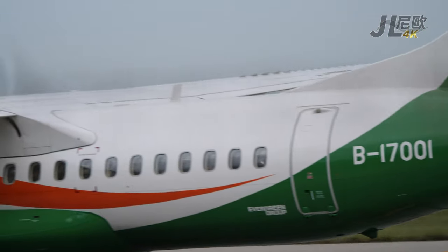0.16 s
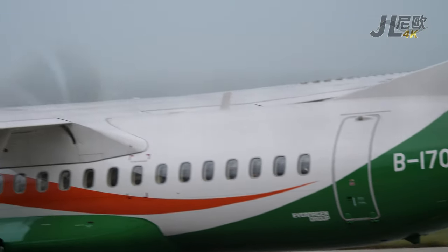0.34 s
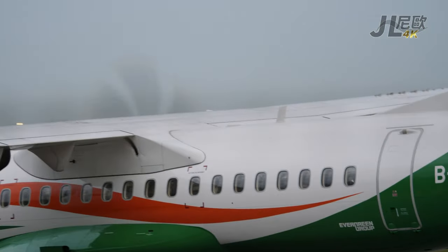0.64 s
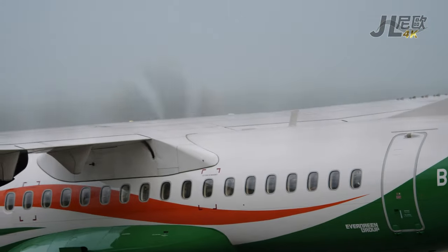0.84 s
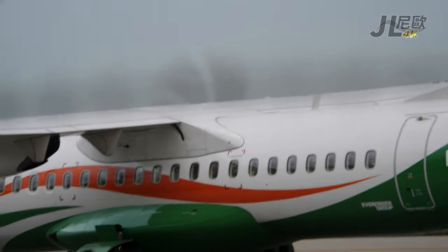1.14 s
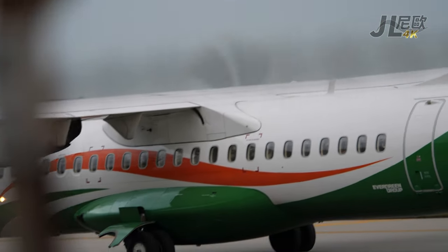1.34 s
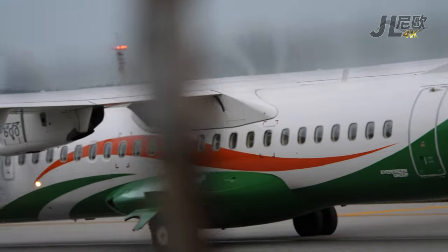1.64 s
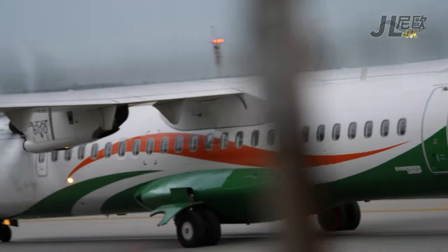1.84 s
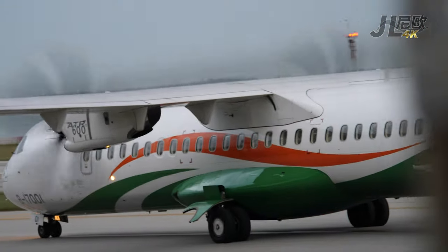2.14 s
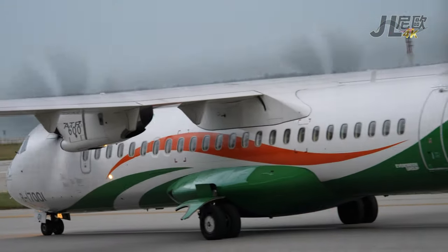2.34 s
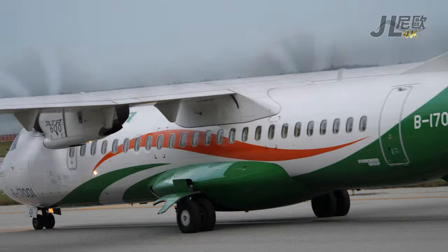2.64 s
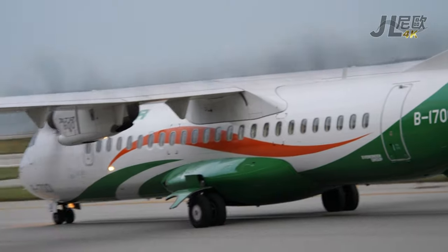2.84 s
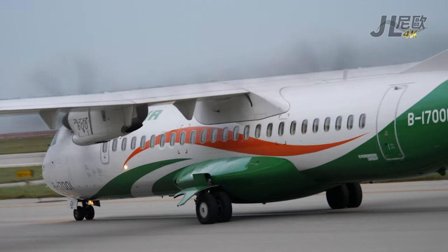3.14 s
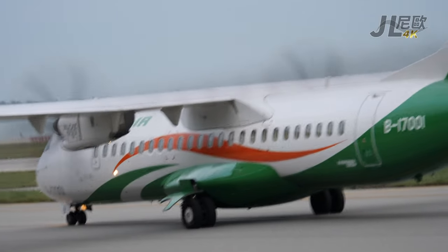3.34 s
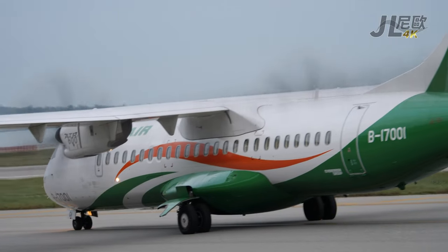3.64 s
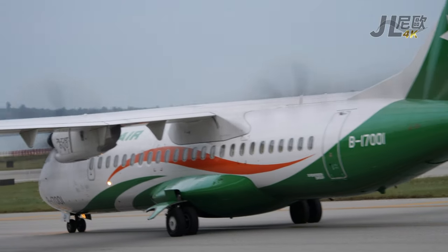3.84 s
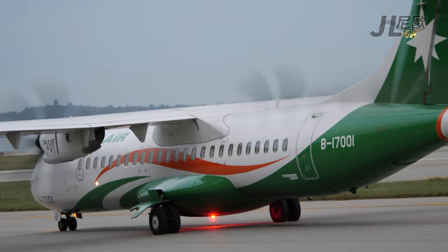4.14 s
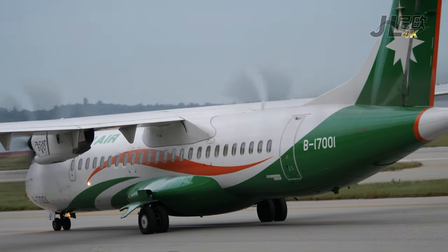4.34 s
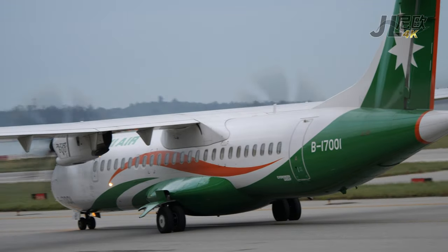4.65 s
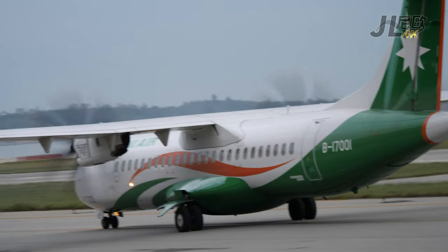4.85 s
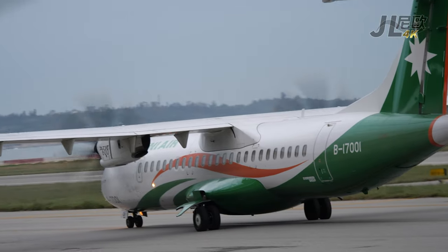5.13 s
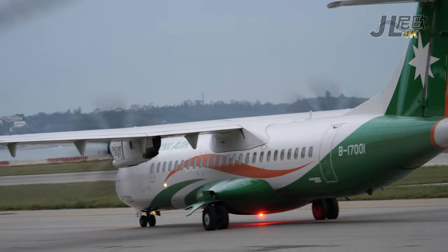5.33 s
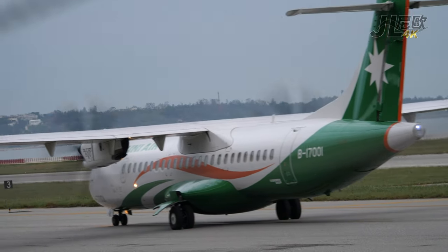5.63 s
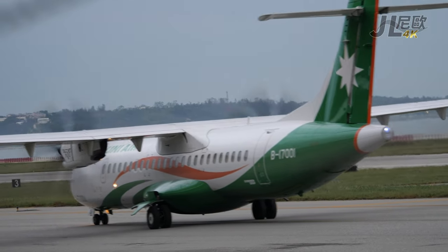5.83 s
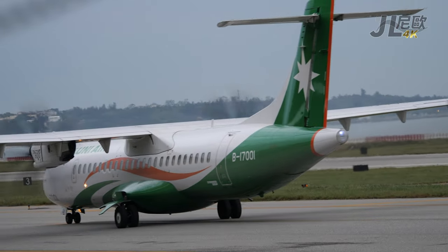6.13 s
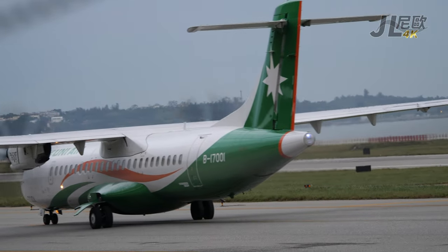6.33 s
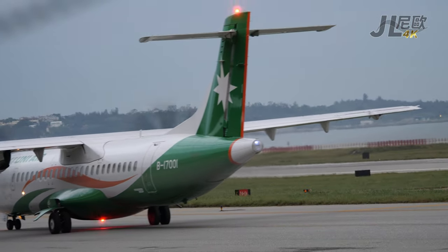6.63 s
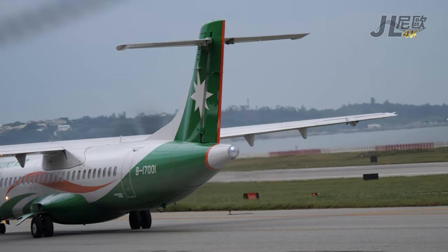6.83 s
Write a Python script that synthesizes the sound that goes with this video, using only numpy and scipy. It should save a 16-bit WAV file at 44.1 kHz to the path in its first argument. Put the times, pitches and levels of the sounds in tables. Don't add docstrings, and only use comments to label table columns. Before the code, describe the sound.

A twin turboprop taxis close past, turbine whine and hissing roar over a low pulsing propeller drone, then darkening as it rolls away.

```python
import sys
import numpy as np
from scipy import signal
from scipy.io import wavfile
from scipy.ndimage import uniform_filter1d, map_coordinates

SR = 44100
rng = np.random.default_rng(int(sys.argv[2]) if len(sys.argv) > 2 else 0)


def file_out(sig):
    cols = np.atleast_2d(sig).T
    lim = np.clip(cols, -1, 1)
    pcm = np.round(lim * 32767).astype(np.int16)
    wavfile.write(sys.argv[1], SR, pcm)


def linear_from_db(decibels):
    return 10 ** (np.asarray(decibels, float) / 20)


N = 307938
HOP = 256
HZ = np.fft.rfftfreq(4 * HOP, 1 / SR)[:, None]
FRAMES = np.arange(-(-N // HOP) + 1) * HOP / SR
CHOP_HZ = 27.5

# frequency in Hz, density in dB per Hz.
AIRPORT_COLOUR = [(20, -35), (55, -41), (75, -18), (100, -8), (125, 15), (170, -43)]
# frequency in Hz, density in dB per Hz.
RUMBLE_COLOUR = [(60, -59), (95, -50), (125, -4.5), (190, 4.5), (260, -3), (330, -7), (400, -10),
                 (520, -8.5), (800, -120)]
# frequency in Hz, density in dB per Hz.
ROAR_AHEAD_COLOUR = [(180, -49), (300, -31.5), (435, -8), (570, -1), (643, -1.5), (725, 0), (810, -0.5),
                     (887, 0.5), (1150, -3), (1270, 0.5), (1550, -1), (2120, 0.5), (2370, -3.5),
                     (2810, -22), (3300, -27), (4290, -69), (7260, -120)]
ROAR_ASTERN_COLOUR = [(180, -43), (300, -18.5), (453, -20.5), (570, -7.5), (711, -6), (826, -2), (923, 1),
                      (1080, -6.5), (1260, -19), (1350, -9.5), (1630, -13.5), (1900, -5.5), (2440, -5.5),
                      (2620, -11), (3300, -33.5), (4290, -63), (7260, -120)]
# frequency in Hz, density in dB per Hz.
HISS_NEAR_COLOUR = [(1760, -45), (3000, -10), (3370, -8.5), (3540, 1.5), (4030, -2.5), (4290, 0),
                    (5130, -5), (6670, -13.5), (7870, -11.5), (9480, -8.5), (11500, -24.5), (12700, -20.5),
                    (13700, -19.5), (14500, -26), (15600, -29)]
HISS_FAR_COLOUR = [(1820, -53), (3100, -25.5), (3290, -13), (3500, -2), (4090, 0), (4490, 3), (4590, -0.5),
                   (4840, 3.5), (6690, -7.5), (7560, -15), (9010, -6.5), (9510, -7.5), (11500, -12),
                   (12600, -20), (15600, -37)]
# frequency in Hz, density in dB per Hz.
CHOP_TOP_COLOUR = [(10500, -40), (12200, -4), (13700, 7), (14600, -7), (15600, -27)]
CHOP_LOW_COLOUR = [(7000, -28), (8500, 4), (9500, 10.5), (11200, -10), (12600, -14), (14000, -60)]

# time in seconds, pitch factor.
DOPPLER_SHIFT = [
    (0, 1.018),
    (1, 1.01),
    (2, 1.005),
    (3, 1.0),
    (4.2, .9995),
    (6.98, .995),
]
# time in seconds, level in dB.
ROAR_LEVEL_DB = [(0, -20.5), (.6, -21), (1, -19.5), (2.4, -19.5), (3.1, -18), (3.7, -18), (4.4, -17.5),
                 (5, -18), (6.98, -18.5)]
# centre in seconds, width in seconds, lift in dB.
HISS_SWEEPS = [
    (.2, 0.5, 2),
    (3.05, 0.1, 1.2),
    (4.3, 0.47, 1.1),
]
# centre in seconds, width in seconds, added share from 0 to 1.
FLUTTER_SWELLS = [
    (2.8, .3, .2),
    (1.1, .8, 0.055),
]
# time in seconds, level in dB.
DRONE_LEVEL_DB = [(0, -26), (1.9, -25), (2.6, -31.5), (4.2, -34), (5.6, -33), (6.98, -27)]
# centre in seconds, width in seconds, change in dB.
PROPELLER_FADES = [(.17, 0.035, -11), (.78, 0.07, -1.5), (1.55, 0.17, -3.5), (2.18, .07, -13),
                   (2.45, .06, -8), (2.92, 0.045, -2), (3.17, .06, -13), (4.35, 0.14, -17),
                   (4.93, 0.034, -8), (5.24, 0.11, -15), (5.58, 0.085, -13), (5.88, 0.073, -10),
                   (6.33, 0.064, -18), (6.65, 0.13, -10)]
# centre in seconds, width in seconds, lift in dB.
MAIN_SWEEPS = [
    (0, 2.1, 10.5),
    (3.1, .9, 14),
    (4.1, .2, 11),
]
GEAR_LINES = [4570, 4662, 4845]
# centre in seconds, width in seconds, change in dB.
ENGINE_FADES = [
    (5.8, .2, -7),
    (6.38, .08, -8),
]
# centre in seconds, width in seconds, lift in dB.
CHOP_TOP_SWEEPS = [(.2, .4, 10), (1.05, .3, 8), (2.1, .2, 5), (2.6, .2, 9), (3.25, .45, 17),
                   (3.97, .3, 16.5), (5, .6, 9.5), (6.95, 1.1, 18)]
# centre in seconds, width in seconds, lift in dB.
CHOP_LOW_SWEEPS = [
    (5.7, .6, 5),
    (6.95, .3, 5),
]
# centre in seconds, width in seconds, change in dB.
LOWER_NOTCH_SWELLS = [
    (3.2, 1.2, -5),
    (0, .2, -6),
]
# centre in seconds, width in seconds, change in dB.
UPPER_NOTCH_SWELLS = [
    (4.2, 1.3, -7),
    (2.2, 1.5, -3),
]

# frequency in Hz, in-phase share, quadrature share, unrelated sound in dB.
SIDE_AHEAD = [(170, 0.0, 0.0, -30), (340, 0.01, -0.01, -29), (600, 0.03, -0.19, -15),
              (780, -0.1, 0.05, -10), (1030, 0.15, 0.09, -14), (1160, 0.2, -0.07, -13),
              (1510, 0.05, -0.06, -18), (1770, 0.21, -0.17, -13), (1890, 0.01, -0.35, -8),
              (2020, -0.42, -0.19, -7), (2370, -0.29, 0.05, -6), (2760, 0.31, 0.07, -5),
              (3320, 0.41, 0.06, -10), (3790, 0.06, -0.01, -18)]
SIDE_ABEAM = [(170, 0.0, 0.0, -30), (340, 0.02, 0.02, -25), (560, 0.07, -0.03, -27), (950, 0.21, -0.2, -17),
              (1080, 0.44, -0.08, -12), (1210, 0.28, 0.47, -8), (1510, 0.05, 0.45, -10),
              (1720, 0.34, 0.09, -12), (2110, 0.02, -0.12, -15), (2410, 0.13, -0.2, -12),
              (2630, -0.1, -0.26, -3), (2760, -0.1, -0.2, -4), (2970, 0.39, 0.13, -7),
              (3790, 0.09, -0.0, -19)]
SIDE_ASTERN = [(170, 0.01, -0.0, -30), (390, 0.02, 0.01, -23), (900, 0.18, -0.09, -23),
               (1030, 0.26, -0.12, -19), (1210, 0.57, -0.13, 0), (1290, -0.16, -0.04, 0),
               (1380, -0.4, -0.11, -2), (1590, -0.37, -0.11, -1), (1680, 0.16, 0.13, -2),
               (1770, 0.24, 0.33, -7), (2410, 0.16, 0.03, -15), (2930, 0.21, -0.04, -5),
               (3060, -0.05, 0.08, -6), (3790, 0.03, 0.01, -19)]
SIDE_TREBLE = [(4090, 0.02, 0, -20), (4900, .04, 0, -16), (5860, .08, -.05, -15), (7000, .08, -.08, -12),
               (7700, .05, -.03, -14), (8300, .02, 0, -21), (9800, .01, 0, -21), (10640, .05, .04, -13),
               (11800, .06, .22, -5), (12490, -.28, .25, -8), (13950, -.12, .25, -11),
               (14770, .12, .12, -8), (15460, .09, -.03, -6)]
# time in seconds, heading (0 ahead, 1 abeam, 2 astern).
HEADING_PATH = [
    (0, 0),
    (1.6, 0),
    (2.8, 1),
    (4.5, 1),
    (5.5, 2),
    (6.98, 2),
]


def unit(x):
    return x / np.sqrt(np.mean(np.abs(x) ** 2) + 1e-20)


def along(points, column=1):
    rows = np.transpose(sorted(points))
    return np.interp(np.log(HZ + 1), np.log(rows[0] + 1), rows[column])


def curve(rows, t):
    seconds, values = np.transpose(rows)
    return np.interp(t, seconds, values)


def ramp(t, start, end):
    return np.clip((t - start) / (end - start), 0, 1)


def bell(x, centre, width):
    return np.exp(-((x - centre) / width) ** 2)


def beams(rows, t):
    return sum(size * bell(t, s, width) for s, width, size in rows)


def wobble(rate):
    knots = rng.standard_normal(int(N * rate / SR) + 4)
    return map_coordinates(knots, [np.arange(N) * rate / SR])


def frames(x):
    return signal.stft(x, nperseg=4 * HOP, noverlap=3 * HOP)[2]


def samples(z):
    return signal.istft(z, nperseg=4 * HOP, noverlap=3 * HOP)[1][:N]


def smooth(field, bins, steps):
    return uniform_filter1d(uniform_filter1d(field, size=bins, axis=0), size=steps, axis=1)


def rush(gain, patchy_db):
    z = frames(rng.standard_normal(N))
    patches = unit(smooth(rng.standard_normal(z.shape), 14, 8))
    steady = gain / np.sqrt(np.mean(np.abs(gain) ** 2, axis=0))
    return unit(samples(z * steady * linear_from_db(patchy_db * patches)))


def tone(hz, drift_hz, rate):
    turns = np.cumsum(hz + drift_hz * wobble(rate)) / SR
    return np.sqrt(2) * np.sin(2 * np.pi * turns)


def airport_hum():
    return linear_from_db(-40.5 + 0.63 * wobble(3.28)) * rush(linear_from_db(along(AIRPORT_COLOUR)), patchy_db=1.5)


def blade_lag(t):
    return 0.0105 * t ** 2 - 0.14


def blade_turn(t, trails=0):
    return (CHOP_HZ * t - blade_lag(t) - trails + 0.5) % 1 - 0.5


def burst(t, trails, width):
    turn = blade_turn(t, trails - 0.02 * wobble(20))
    throw = np.exp(-(turn / width) ** 2 / 2)
    after = 0.5 * np.exp(-((turn - 0.2) / 0.11) ** 2 / 2)
    return (throw + after) / np.sqrt(1.2 * width + 0.05)


def blade_chops(t):
    width_turns = 0.04 + 0.012 * (t - 3.2) ** 2
    top_db = -55 + beams(CHOP_TOP_SWEEPS, t)
    low_db = -60 + 3.2 * t + beams(CHOP_LOW_SWEEPS, t)
    astern = ramp(t, 5.4, 6.2)
    glint_hz = 13900 - 2900 * astern - 4500 * blade_turn(t)
    glint_share = 0.6
    glint = glint_share * tone(glint_hz, drift_hz=450, rate=60)
    hiss_share = (1 - 0.76 * astern) * np.sqrt(1 - glint_share ** 2)
    top = glint + hiss_share * rush(linear_from_db(along(CHOP_TOP_COLOUR)), patchy_db=0.8)
    top = linear_from_db(top_db + 1.1 * wobble(25)) * top
    low = linear_from_db(low_db + 1.5 * wobble(25)) * rush(linear_from_db(along(CHOP_LOW_COLOUR)), patchy_db=0.8)
    return burst(t, 0, width_turns) * top + burst(t, 0.18, 0.1) * low


def turbine_lines(t):
    shift = curve(DOPPLER_SHIFT, t)
    main_db = -45 + beams(MAIN_SWEEPS, t)
    gear_db = -40 - 9 * np.maximum(t - 2.3, 0)
    rear_db = -33 - 12 * np.maximum(5.2 - t, 0) + beams(ENGINE_FADES, t)
    main = linear_from_db(main_db - 1 + 2 * wobble(35)) * tone(4256 * shift, drift_hz=4, rate=40)
    gears = sum(linear_from_db(gear_db + 0.99 * wobble(15)) * tone(hz * shift, drift_hz=2.6, rate=9.2)
                for hz in GEAR_LINES)
    rear = linear_from_db(rear_db + 3 * wobble(55)) * tone(4735 * shift, drift_hz=22, rate=110)
    return main + gears + rear


def blade_drone(t):
    level_db = curve(DRONE_LEVEL_DB, t) + beams(PROPELLER_FADES, t) + 0.97 * wobble(6.4)
    return linear_from_db(level_db) * tone(126.2 * curve(DOPPLER_SHIFT, t), drift_hz=1.0, rate=5)


def exhaust_rumble(t):
    level_db = -27 - 1.08 * t + 1.56 * wobble(6)
    return linear_from_db(level_db) * rush(linear_from_db(along(RUMBLE_COLOUR)), patchy_db=0.97)


def body_notches_db():
    lower_hz = 7110 + 450 * ramp(FRAMES, 5, 8.2)
    lower_db = -2 + beams(LOWER_NOTCH_SWELLS, FRAMES)
    upper_hz = 11550 + 33 * (FRAMES - 1.5) ** 2
    upper_db = -2 + beams(UPPER_NOTCH_SWELLS, FRAMES)
    return lower_db * bell(HZ, lower_hz, 350) + upper_db * bell(HZ, upper_hz, 450)


def hiss(t, gust):
    level_db = curve(ROAR_LEVEL_DB, t) - 2.5 - 0.18 * t + beams(HISS_SWEEPS, t)
    level_db = level_db + 0.29 * gust + 0.37 * wobble(10)
    astern = ramp(FRAMES, 3.2, 6.9)
    colour_db = (1 - astern) * along(HISS_NEAR_COLOUR) + astern * along(HISS_FAR_COLOUR)
    colour_db = colour_db + body_notches_db()
    flutter = 0.1 + beams(FLUTTER_SWELLS, t)
    flutter_turns = 3 * (CHOP_HZ * t - blade_lag(t) - 0.059)
    blades = 1 + 0.73 * flutter * np.cos(2 * np.pi * flutter_turns)
    return linear_from_db(level_db) * blades * rush(linear_from_db(colour_db) * (HZ > 2000), patchy_db=0.79)


def apron_echo_db():
    echo = 1 - ramp(FRAMES, 1.3, 2.5)
    first = -9.5 * echo * bell(HZ, 575 + 105 * FRAMES ** 2, 150)
    second = -5.5 * echo * bell(HZ, 1896 + 183 * FRAMES, 420)
    crest_db = 5 * (1 - ramp(FRAMES, 2.9, 3.6))
    return first + second + crest_db * bell(HZ, 1470 + 70 * FRAMES ** 2, 180)


def exhaust_roar(t, gust):
    level_db = curve(ROAR_LEVEL_DB, t) + 0.5 * gust + 0.33 * wobble(20)
    turned = ramp(FRAMES, 3.7, 5.67)
    colour_db = (1 - turned) * along(ROAR_AHEAD_COLOUR) + turned * along(ROAR_ASTERN_COLOUR)
    shadow_db = -7 * (1 - ramp(FRAMES, 0.45, 1.3)) * bell(HZ, 1240, 210)
    return linear_from_db(level_db) * rush(linear_from_db(colour_db + apron_echo_db() + shadow_db), patchy_db=0.56)


def mid_port():
    t = np.arange(N) / SR
    gust = wobble(3.04)
    background = airport_hum() + blade_chops(t) + turbine_lines(t) + blade_drone(t)
    return background + exhaust_rumble(t) + hiss(t, gust) + exhaust_roar(t, gust)


def side_blend(column):
    heading = curve(HEADING_PATH, FRAMES)
    blend = 0
    for k, pose in enumerate((SIDE_AHEAD, SIDE_ABEAM, SIDE_ASTERN)):
        weight = np.clip(1 - abs(heading - k), 0, 1)
        blend = blend + weight * along(list(pose) + list(SIDE_TREBLE), column)
    return blend


def scene():
    mid = frames(mid_port())
    spread = np.sqrt(abs(smooth(abs(mid) ** 2, 3, 3)))
    scatter = unit(frames(rng.standard_normal(N))) * spread * linear_from_db(side_blend(3) - 0.8)
    shifted = mid * (side_blend(1) + 1j * side_blend(2))
    no_bass = 0.25 + 0.75 / (1 + (260 / (HZ + 1)) ** 4)
    centre = samples(mid)
    side = samples(no_bass * (shifted + scatter))
    return np.array([centre + side, centre - side])


def roll_off(x):
    return signal.sosfilt(signal.butter(12, 15710, fs=SR, output="sos"), x)


def record(dry):
    return roll_off(dry)


dry = scene()
out = record(dry)
file_out(out)
```